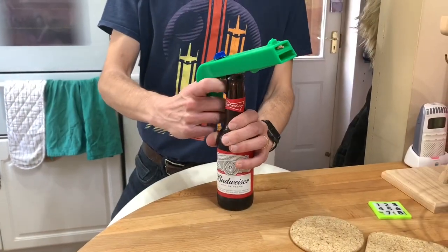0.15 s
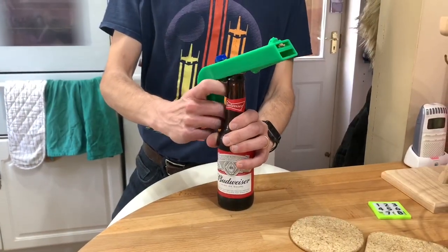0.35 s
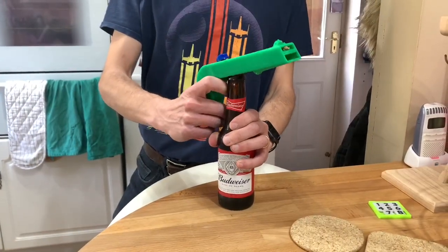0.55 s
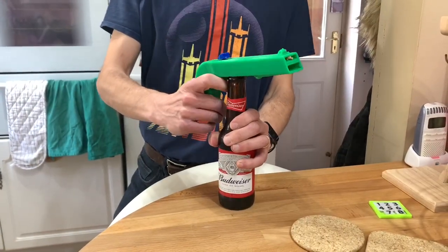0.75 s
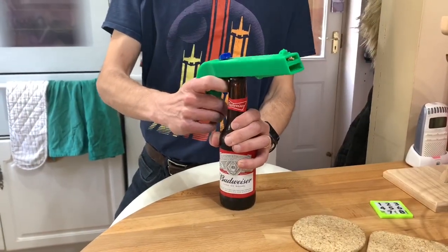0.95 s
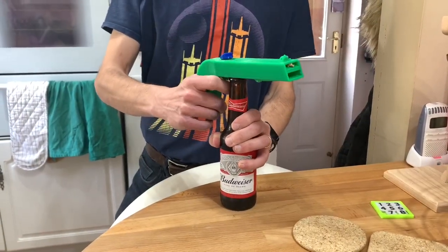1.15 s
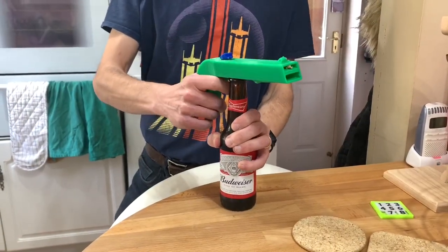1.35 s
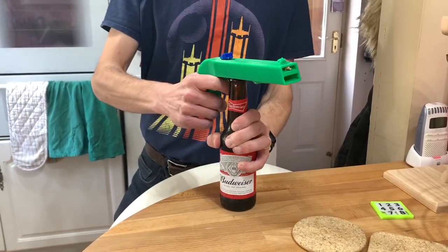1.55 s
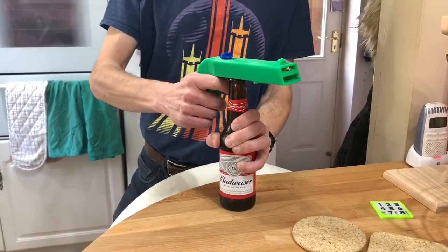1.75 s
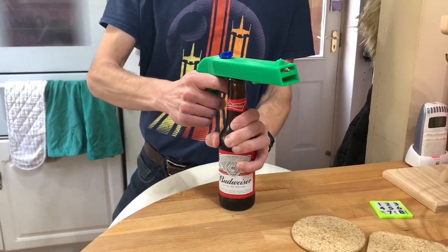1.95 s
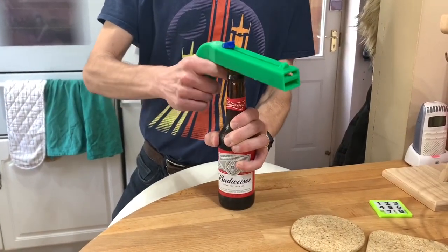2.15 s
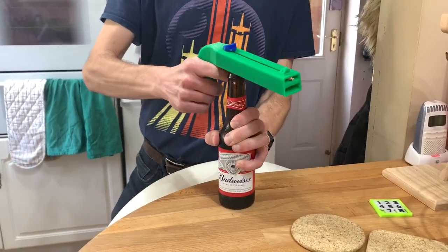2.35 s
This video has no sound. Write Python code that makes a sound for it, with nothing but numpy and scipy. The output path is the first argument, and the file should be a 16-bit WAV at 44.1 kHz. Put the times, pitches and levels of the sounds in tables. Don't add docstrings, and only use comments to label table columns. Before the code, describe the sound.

A plastic opener clacks onto a glass bottle, then levers the cap off with a sharp pop

```python
import sys
import numpy as np
from scipy import signal
from scipy.fft import rfft, irfft
from scipy.io import wavfile

SR = 44100
rng = np.random.default_rng(int(sys.argv[2]) if len(sys.argv) > 2 else 0)


def dump_mix(stems):
    frames = np.atleast_2d(stems).T
    limited = np.clip(frames, -1, 1)
    pcm = np.round(limited * 32767).astype(np.int16)
    wavfile.write(sys.argv[1], SR, pcm)


def boost_factor(decibels):
    exponent = np.asarray(decibels, float) / 20
    return 10 ** exponent


N = 110250
GRAIN_DB = 1.5


def at_hz(points, hz):
    return np.interp(np.log(hz), np.log(np.array(points)[:, 0]), np.array(points)[:, 1])


def rms_one(x):
    return x / np.sqrt(np.mean(x ** 2) + 1e-20)


def ring(x, hz, t60):
    radius = boost_factor(-60 / (max(t60, 0.003) * SR))
    w = 2 * np.pi * hz / SR
    return signal.lfilter([0, np.sin(w)], [1, -2 * radius * np.cos(w), radius ** 2], x + 1e-18)


def peak(x, hz, width_hz):
    radius = np.exp(-np.pi * width_hz / SR)
    w = 2 * np.pi * hz / SR
    feed = np.array([1, 0, -1]) * (1 - radius ** 2) / 2
    return signal.lfilter(feed, [1, -2 * radius * np.cos(w), radius ** 2], x)


def peak_twice(x, hz, width_hz):
    return peak(peak(x, hz, width_hz), hz, width_hz)


def bands(size):
    # (frequency [Hz], correlation [-1..1])
    likeness = [(50, 0.95), (200, 0.61), (700, 0.24), (3000, 0.036), (12000, 0.077)]
    edges = 20 * 2 ** np.arange(0, 10.1, 0.5)
    white = rng.standard_normal((2, 2, size))
    for k, (low, high) in enumerate(zip(edges, edges[1:])):
        band = signal.butter(2, [low, high], "band", fs=SR, output="sos")
        mid, side = signal.sosfilt(band, white[k % 2])
        hz = np.sqrt(low * high)
        alike = np.clip(at_hz(likeness, hz), -1, 1)
        yield hz, np.sqrt(1 + alike) * mid + np.sqrt(1 - alike) * side * [[1], [-1]]


def swell(rows):
    t = np.arange(N) / SR
    return sum(boost_factor(db) * np.sin(np.pi * np.clip((t - s) / length, 0, 1)) ** 0.4 for s, length, db in rows)


def burst(length_s):
    t = np.arange(4096) / SR / max(length_s, 0.0002)
    grains = rng.standard_normal(4096) * boost_factor(GRAIN_DB * np.repeat(rng.standard_normal(256), 16))
    rise = np.clip(t / 0.16, 0, 1)
    fall = np.exp(-4 * np.clip(t - 0.6, 0, None))
    return grains * rise * fall * boost_factor(-GRAIN_DB)


def soften(x, centre_hz, share):
    return peak_twice(np.pad(x, (0, 4096)), centre_hz, share * centre_hz)


def strike(modes, force):
    force = np.pad(force, (0, SR // 3))
    levels_db = [db + 2 * rng.standard_normal() for _, db, _ in modes]
    return sum(boost_factor(db) * ring(force, hz, t60) for db, (hz, _, t60) in zip(levels_db, modes))


def add(out, s, x):
    i = int(s * SR)
    out[i:i + len(x)] += x[:N - i]


def blows(modes, rows, share):
    out = np.zeros(N)
    for s, db, length, hz in rows:
        force = soften(burst(length), hz, share) / np.sqrt(length * SR)
        add(out, s, boost_factor(db) * strike(modes, force))
    return out


def room_tone():
    # (frequency [Hz], density [dB per Hz])
    tone_colour = [(20, 2), (75, -0.5), (150, -15.5), (500, -25), (1000, -25), (2500, -34), (6500, -44.5),
                   (10000, -41)]
    settle = SR // 4
    tone = rms_one(sum(boost_factor(at_hz(tone_colour, hz)) * b[:, settle:] for hz, b in bands(N + settle)))
    whirr = rms_one(peak_twice(rng.standard_normal((2, N)), 1005, 120))
    return boost_factor(-63) * tone + boost_factor(-85) * whirr


def kitchen(x):
    # (frequency [Hz], t60 [s])
    room_t60 = [(60, 1.02), (250, 0.4), (1000, 0.2385), (4000, 0.29), (8000, 0.2049), (14000, 0.18)]
    # (frequency [Hz], level [dB])
    room_db = [(60, -12.5), (250, -8.5), (1000, 3), (4000, -2.5), (8000, -5.5), (14000, -2.5)]
    gap_s = 0.002
    t = np.arange(SR // 2) / SR
    tail = sum(boost_factor(at_hz(room_db, hz) - 60 * t / at_hz(room_t60, hz)) * b for hz, b in bands(len(t)))
    tail = tail * np.clip(t / gap_s - 1, 0, 1) * np.sqrt(np.log(1000) * 3.62 / SR)
    return signal.fftconvolve(tail, x[None], axes=1)[:, :N]


def creaks():
    # (time [s], length [s], level [dB], pitch [Hz])
    creak_rows = [(.005, 0.046, -70.5, 1840), (0.063, 0.019, -63, 1850), (0.015, 0.15, -72.5, 620),
                  (0.606, 0.092, -65, 970), (0.615, 0.075, -73.5, 520), (0.846, 0.029, -72.5, 587),
                  (.85, .03, -77.5, 1540), (1.435, 0.064, -79.5, 1580), (1.62, 0.048, -63.5, 1000),
                  (1.657, 0.048, -69, 1000), (1.911, 0.094, -75, 1040)]
    out = np.zeros(N)
    for s, length, db, hz in creak_rows:
        tone = rms_one(soften(rng.standard_normal(N), hz, 0.44)[:N])
        out += swell([(s, length, db)]) * tone
    return out


def slides():
    # (time [s], length [s], level [dB])
    slide_rows = [
        (.03, 0.039, -70),
        (.07, 0.057, -59.5),
        (.6, 0.12, -78),
        (1.6, 0.078, -74.5),
    ]
    # (frequency [Hz], density [dB per Hz])
    rub_colour = [(900, -6), (2000, 0.5), (5000, -1), (7000, -8.5), (9500, -3.5), (15000, -16.5)]
    rub = rms_one(sum(boost_factor(at_hz(rub_colour, hz)) * b[0] for hz, b in bands(N) if hz > 900))
    return swell(slide_rows) * rub


def gas_leaks():
    # (time [s], length [s], level [dB])
    leak_rows = [
        (1.445, 0.047, -67),
        (1.51, 0.095, -67),
        (1.565, 0.026, -61),
    ]
    # (frequency [Hz], width [Hz], level [dB])
    jet_peaks = [(6000, 800, -9.5), (9830, 940, 10.5), (12960, 2200, 4.5), (15000, 1500, 3.5),
                 (8000, 6600, -1.5)]
    gusts = np.repeat(rng.standard_normal(N // 128 + 1), 128)[:N]
    white = rng.standard_normal(N) * boost_factor(GRAIN_DB * 0.9 * gusts)
    jet = rms_one(sum(boost_factor(db) * peak_twice(white, hz, width) for hz, width, db in jet_peaks))
    return swell(leak_rows) * jet


def table_thumps():
    # (time [s], level [dB], pitch region [Hz])
    thump_rows = [(0.022, -53, 187), (0.043, -43, 68), (0.2022, -51.5, 405), (.224, -34.5, 420),
                  (0.229, -23.5, 158), (0.247, -31.5, 125), (0.331, -43, 58.5), (0.472, -45.5, 80.4),
                  (.49, -47.5, 203.8), (.2305, -23, 312), (0.552, -48, 67.6), (.621, -58.5, 480),
                  (1.974, -48.5, 200.3), (2.046, -31, 205), (2.058, -35, 75.2), (2.11, -35.5, 269),
                  (2.15, -41.5, 67.6), (2.2, -34.5, 170), (2.218, -29, 67.64), (2.271, -40.5, 192)]
    # (frequency [Hz], level [dB], t60 [s])
    table_modes = [(49.3, 0.5, 0.058), (66.3, -3.5, 0.2), (105, -5.5, 0.15), (138, -3, 0.18),
                   (168.1, -1, 0.11), (205, -5, 0.15), (253, -7.5, 0.07), (419.3, -8, 0.05), (312, 3, 0.07)]
    click = np.zeros(64)
    click[0] = 1
    out = np.zeros(N)
    for s, db, hz in thump_rows:
        add(out, s, boost_factor(db) * strike(table_modes, soften(click, hz, 0.89)))
    return out


def hard_ticks():
    # (time [s], level [dB], length [s], colour centre [Hz])
    tick_rows = [(0.1917, -58.5, 0.006, 3000), (0.196, -56.5, 0.017, 3456), (0.2097, -46, 0.0084, 4010),
                 (0.2138, -29.5, 0.0057, 4300), (.2145, -29.5, 0.003, 9200), (.2218, -28, 0.0045, 1790),
                 (0.2284, -31, 0.0045, 1470), (0.4905, -43.5, 0.0048, 3860), (0.618, -71, 0.0025, 4730),
                 (1.637, -61, 0.0024, 2510), (0.669, -72, 0.0059, 3600), (1.9706, -48, 0.0021, 2930),
                 (1.972, -48.5, 0.042, 2330), (2.023, -41, 0.0038, 5020), (2.04, -44, 0.0082, 3500),
                 (2.045, -49.5, .008, 3500), (2.054, -53, .003, 3000), (2.0581, -27, 0.0025, 7380),
                 (2.0594, -22.5, 0.0028, 3940), (2.071, -38.5, 0.012, 3000), (2.0768, -38.5, 0.007, 9000),
                 (2.081, -49, 0.02, 8000), (2.1064, -33, 0.003, 5030), (2.190, -42.5, 0.0058, 8000),
                 (2.1948, -25.5, 0.0023, 8190), (2.196, -25, 0.005, 9000), (2.2, -26.5, .007, 8000),
                 (2.209, -34.5, 0.0068, 6000), (2.224, -39, 0.011, 9050), (2.234, -45.5, .01, 9000)]
    out = np.zeros(N)
    for s, db, length, hz in tick_rows:
        coloured = peak(peak(burst(length), hz, hz), hz, 2 * hz)
        add(out, s, boost_factor(db + 11) * coloured)
    return out


def opener_knocks():
    # (time [s], level [dB], length [s], pitch region struck [Hz])
    knock_rows = [(0.189, -40.5, 0.039, 1606), (0.2178, -32, 0.0028, 2100), (0.2218, -21, 0.0004, 1600),
                  (0.2285, -23, 0.0004, 1400), (0.233, -34, 0.0053, 794), (0.243, -53, 0.0025, 1950),
                  (0.26, -50.5, 0.012, 1750), (0.4893, -44.5, 0.00016, 2200), (.499, -36, 0.002, 2150),
                  (0.491, -51, 0.0023, 607), (0.6164, -47.5, 0.0016, 1000), (1.6375, -54.5, .002, 1000),
                  (1.972, -41, 0.006, 960), (1.974, -45, 0.028, 1700), (2.023, -33.5, 0.00023, 1500),
                  (2.034, -37.5, 0.02, 600), (2.078, -30.5, 0.018, 1387), (2.113, -32, 0.009, 800),
                  (2.207, -28.5, 0.025, 1700), (2.023, -34, 0.0035, 550), (2.057, -17, 0.0032, 638),
                  (2.0597, -24, 0.0023, 2300), (2.086, -33.5, 0.019, 920), (2.117, -31, 0.0063, 600),
                  (2.068, -33.5, 0.01, 700), (2.1085, -30.5, 0.003, 570), (2.1088, -29, 0.00026, 1750),
                  (2.198, -25.5, 0.0056, 880), (2.197, -22, 0.006, 2070)]
    # (frequency [Hz], level [dB], t60 [s])
    opener_modes = [(356, 0, 0.02), (510, 5, 0.03), (570, 6, 0.035), (732, 0, 0.02), (870, -2, 0.02),
                    (990, -5, 0.025), (1110, -10, 0.015), (1600, -3, 0.012), (1916, -5.5, 0.015),
                    (2455, -10, .02), (1375, -2, 0.035), (1765, -3, 0.022), (2130, -3, 0.04),
                    (2270, -3, 0.04)]
    return blows(opener_modes, knock_rows, 0.63)


def cap_rings():
    # (time [s], level [dB], length [s], pitch region struck [Hz])
    cap_rows = [(0.2155, -33, 0.003, 4600), (0.234, -37.5, 0.0036, 4750), (0.4925, -60, 0.0003, 3370),
                (.503, -45, 0.00072, 3650), (2.0232, -42.5, 0.00077, 4600), (2.075, -47, 0.0046, 4420),
                (2.109, -46, 0.0016, 4800), (2.193, -22, 0.00013, 3450), (2.199, -32, 0.0002, 4970),
                (2.2023, -19.5, 0.00073, 4760), (2.223, -30.5, 0.0042, 5090), (2.247, -35, 0.004, 4760)]
    # (frequency [Hz], level [dB], t60 [s])
    cap_modes = [(3130, -12, 0.04), (3300, -6, 0.05), (3688, 2, 0.06), (4280, -8, 0.03), (4608, -9, 0.03),
                 (4828, -9, 0.08), (4872, -8, .04), (5008, -6, .12), (5047, -10, 0.09), (5120, -7, 0.04),
                 (5160, -5, .03), (5335, -13, 0.06), (6600, -13, 0.04), (7330, -14, .04)]
    return blows(cap_modes, cap_rows, 0.3)


def off_centre(x):
    # (frequency [Hz], lead [rad])
    left_lead = [(100, .15), (1120, .4), (2800, 1.1), (5500, 1.9), (14000, 1.3)]
    hz = np.arange(N // 2 + 1) * SR / N + 1
    right = irfft(rfft(x) * np.exp(-1j * at_hz(left_lead, hz)), N)
    return np.array([boost_factor(-0.6) * x, right])


def scene():
    friction = creaks() + slides() + gas_leaks()
    hits = table_thumps() + hard_ticks() + opener_knocks() + cap_rings()
    echo = kitchen(hits + boost_factor(-2.5) * friction)
    return off_centre(hits + friction) + echo + room_tone()


def band_limit(x):
    return signal.sosfilt(signal.butter(12, 16300, fs=SR, output="sos"), x)


def record(dry):
    hz = np.arange(N // 2 + 1) * SR / N
    dip_db = -22 * np.exp(-((hz - 11600) / 480) ** 2)
    top_cut_db = -25 * np.clip((hz - 15300) / 600, 0, 3)
    mix = irfft(rfft(dry) * boost_factor(dip_db + top_cut_db), N)
    return band_limit(mix)


dry = scene()
out = record(dry)
dump_mix(out)
```